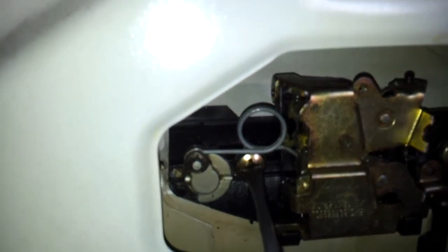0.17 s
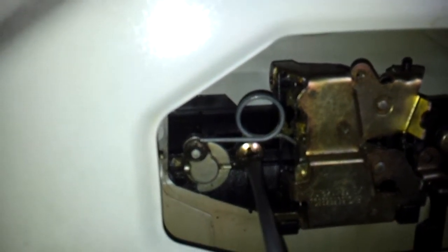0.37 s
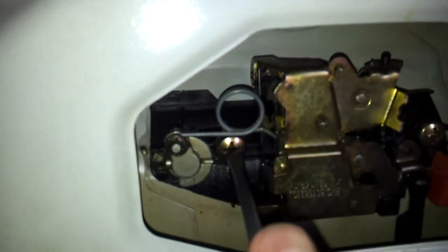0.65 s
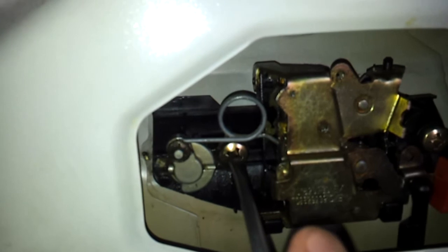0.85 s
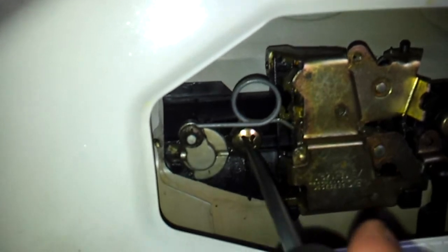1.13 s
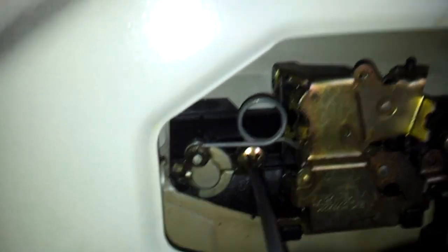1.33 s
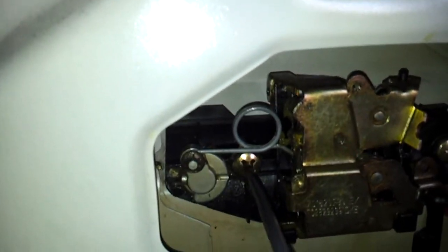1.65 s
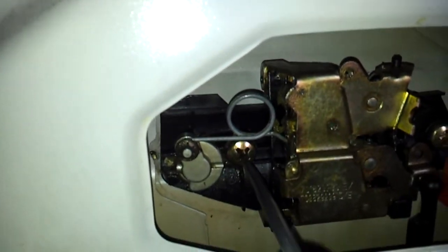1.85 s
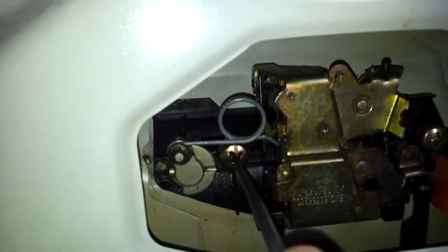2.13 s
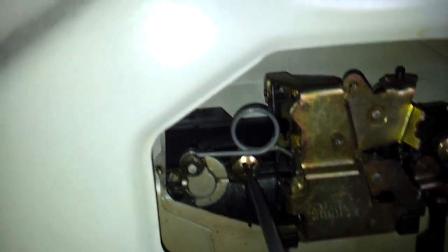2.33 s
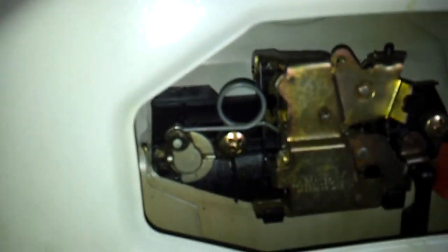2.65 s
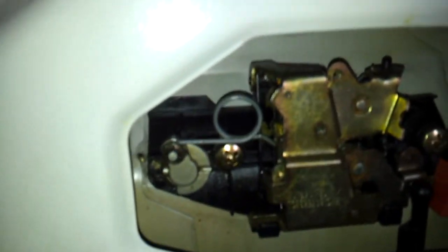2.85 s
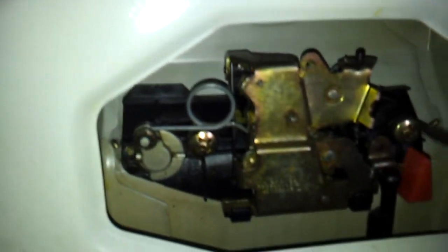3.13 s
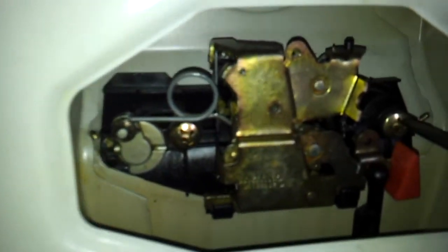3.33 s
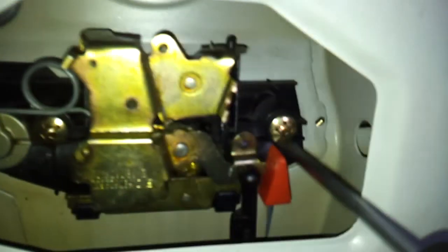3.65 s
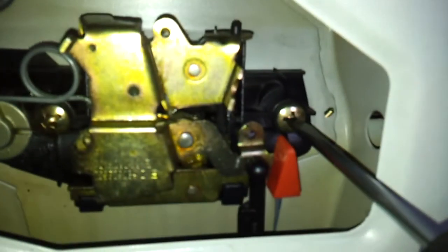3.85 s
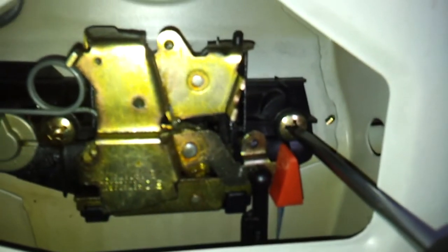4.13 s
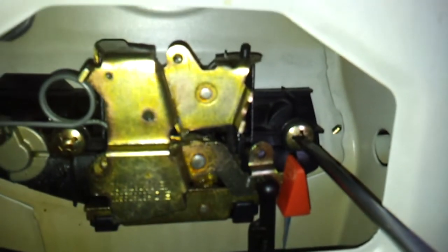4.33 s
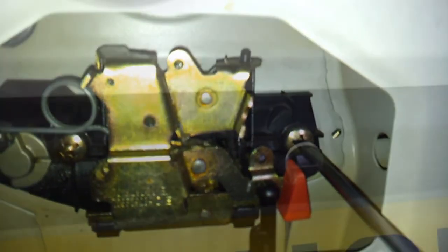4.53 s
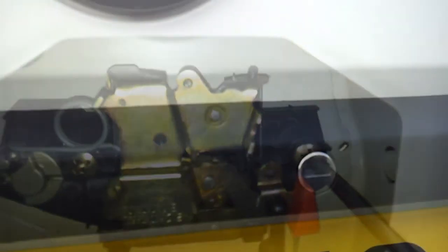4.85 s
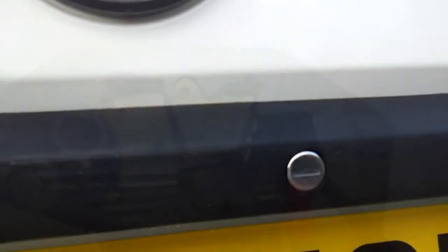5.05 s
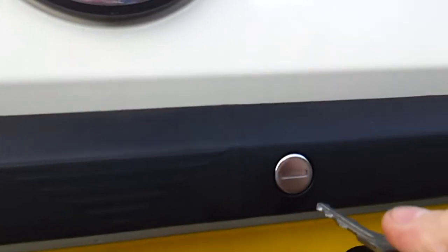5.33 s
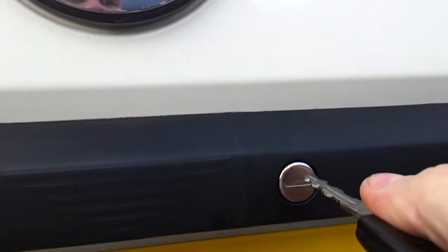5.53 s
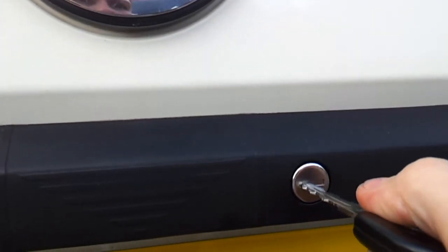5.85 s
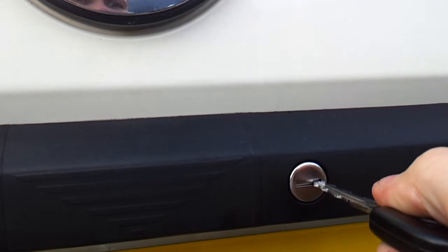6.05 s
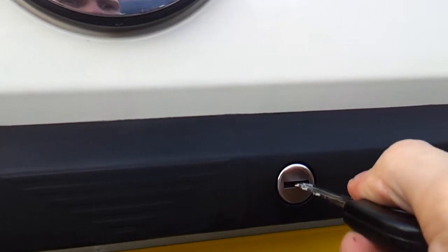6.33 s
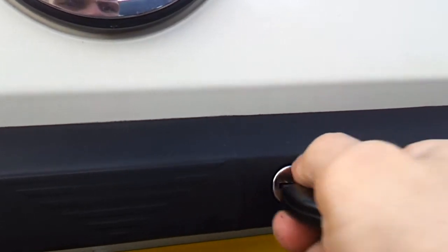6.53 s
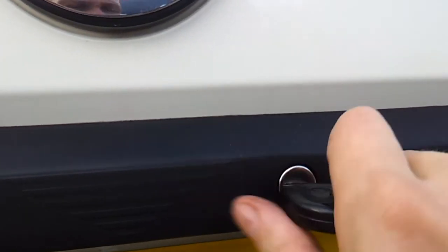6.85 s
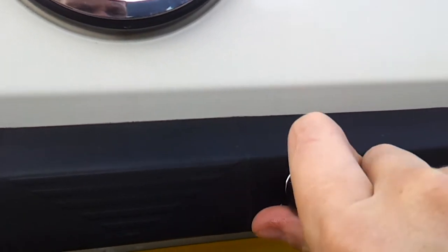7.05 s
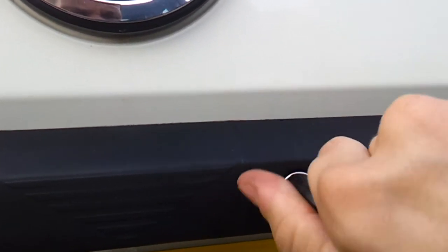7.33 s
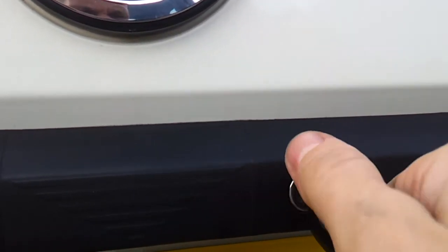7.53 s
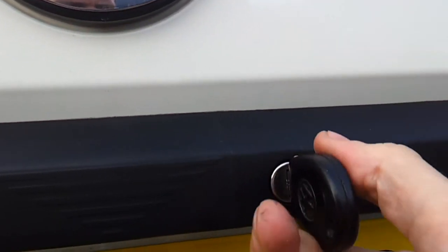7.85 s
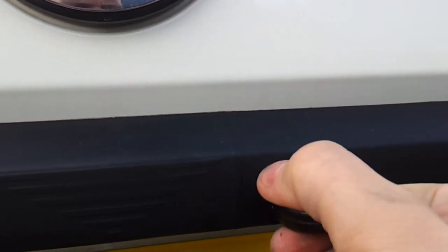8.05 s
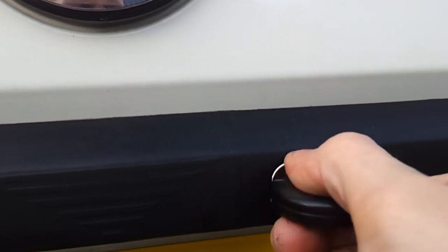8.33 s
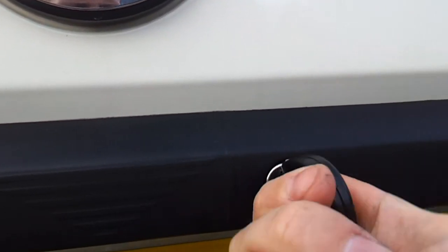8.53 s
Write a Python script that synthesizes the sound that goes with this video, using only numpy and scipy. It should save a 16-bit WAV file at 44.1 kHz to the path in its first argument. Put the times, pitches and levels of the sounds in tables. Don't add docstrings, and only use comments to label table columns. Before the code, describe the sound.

Close to a handheld camera, a screwdriver strikes and skids over a latch in a hollow sheet-metal door, each irregular blow leaving a short boxy ring. The scene fades outdoors: a near bird chirps four times, a farther one answers with echo, and a key taps a lock, rasps quickly over the pins and clicks as it turns. Level bird whistles come near the end, over low town rumble and microphone hiss.

```python
import sys
import numpy as np
from scipy import signal
from scipy.fft import rfft, irfft, next_fast_len
from scipy.io import wavfile
from scipy.ndimage import uniform_filter1d, map_coordinates

SR = 44100
rng = np.random.default_rng(int(sys.argv[2]) if len(sys.argv) > 2 else 0)


def generate_wav(signal):
    frames = np.transpose(np.atleast_2d(signal))
    scaled = np.clip(frames, -1, 1) * 32767
    pcm = np.round(scaled).astype(np.int16)
    wavfile.write(sys.argv[1], SR, pcm)


def makeup_ratio(level_db):
    decades = np.asarray(level_db, float) / 20
    return 10 ** decades


N = 382788
TOP_HZ = 14700

# (time [s], push [dB])
KEY_PUSH = [
    (6.965, -73),
    (6.974, -44),
    (7.035, -41),
    (7.067, -38.5),
    (7.099, -31.5),
    (7.143, -34.5),
    (7.152, -71),
    (7.163, -45),
    (7.18, -92),
]


def unit(x):
    return x / np.sqrt(np.mean(x ** 2) + 1e-20)


def along(points, hz):
    f, v = np.transpose(points)
    return np.interp(np.log(hz + 1), np.log(f + 1), v)


def add(out, s, sound):
    part = out[:, round(s * SR):][:, :sound.shape[1]]
    part += sound[:, :part.shape[1]]


def rush(spectrum, patchy_db):
    # (frequency [Hz], correlation [-1 to 1])
    alike = [(60, 0.32), (180, 0.7), (550, 0.33), (1650, -0.06), (4970, 0.02), (15000, -0.06)]
    z = signal.stft(rng.standard_normal((2, N + SR)), nperseg=512)[2]
    field = uniform_filter1d(rng.standard_normal(z.shape[1:]), size=6, axis=0)
    field = uniform_filter1d(field, size=14, axis=1)
    m = next_fast_len(N + SR // 2)
    noise = signal.istft(z * makeup_ratio(patchy_db * unit(field)), nperseg=512)[1]
    pair = rfft(noise[:, :m])
    hz = np.fft.rfftfreq(m, 1 / SR)
    colour = makeup_ratio(along(spectrum, hz)) * (hz < TOP_HZ)
    turn = np.arccos(np.clip(along(alike, hz), -1, 1)) / 2
    mid, side = irfft(pair * colour * [np.cos(turn), np.sin(turn)], m)[:, :N]
    return unit(np.array([mid + side, mid - side]))


def air():
    # (time [s], hiss level [dB])
    hiss_curve = [(0.0, -78.5), (1.04, -81), (1.91, -80), (2.03, -75), (2.7, -82.5), (3.14, -79.5),
                  (3.58, -84.5), (4.23, -75.5), (5.05, -85), (5.75, -78), (6.28, -81.5), (6.48, -75),
                  (6.91, -79), (7.11, -76), (7.25, -79.5), (8.68, -77)]
    # (middle [s], length [s], rumble [dB], rustle [dB])
    grips = [(0.12, 0.25, -79, -75), (0.447, 0.52, -78, -72.5), (3.098, 0.22, -74, -88),
             (3.33, 0.56, -97, -79), (4.39, 0.11, -63, -88), (5.955, 0.25, -77, -92.5),
             (6.45, 0.31, -66, -86), (6.931, 0.1, -56, -72), (7.02, 0.11, -58, -65),
             (7.113, 0.15, -38.5, -80), (7.244, 0.15, -66, -69.5), (7.704, 0.36, -67, -85),
             (8.234, 0.34, -70, -100)]
    # (from [s], to [s])
    outside = (4.8, 5.28)
    # (frequency [Hz], density [dB per Hz])
    rumble_colour = [(15, -57.5), (25, -36), (76, -5), (102, -7.5), (116, -6), (135, 2.5), (216, -6),
                     (320, -16), (420, -34), (700, -120)]
    indoor_town = [(160, -19), (280, -4.5), (379, -6.5), (590, -9.5), (650, -5.5), (720, -12), (921, -12.5),
                   (1270, -10), (1510, -13.5), (2500, -18.5), (3250, -40), (5500, -120)]
    street = [(160, -14), (280, -4.5), (572, -12), (627, -10), (774, -7.5), (1080, -11), (1220, -18.5),
              (2500, -24), (3250, -35), (5500, -120)]
    hiss_colour = [(1290, -4), (2200, -4), (3110, -4.5), (5480, -8), (6160, -9.5), (6660, -6),
                   (10700, -6.5), (14400, -8.5)]

    t = np.arange(N) / SR
    hiss_db = np.interp(t, *np.transpose(hiss_curve))
    gain_db = hiss_db - hiss_db.mean()
    s, length, *grip_db = np.transpose(grips)[:, :, None]
    swell = np.clip(1 - np.abs(2 * (t - s) / length), 0, 1) ** 2
    shake, rustle = ((makeup_ratio(db) * swell).sum(0) for db in grip_db)
    drift_db = [np.interp(4 * t, np.arange(60), rng.standard_normal(60)) for layer in range(2)]
    rumble = makeup_ratio(-69 + 0.22 * gain_db + 1.15 * drift_db[0]) + shake
    town = makeup_ratio(-73.5 + 0.83 * gain_db + 0.29 * drift_db[1])
    hiss = makeup_ratio(hiss_db + 3.0) + rustle
    turn = np.interp(t, outside, (0, np.pi / 2))
    traffic = np.cos(turn) * rush(indoor_town, 1.5) + np.sin(turn) * rush(street, 3.4)
    out = makeup_ratio(-1.0) * rumble * rush(rumble_colour, 1.3)
    out += makeup_ratio(3.5) * town * traffic
    return out + makeup_ratio(5.5) * hiss * rush(hiss_colour, 1.0)


def hum():
    # (frequency [Hz], level [dB], start [s], end [s])
    far_tones = [
        (146, -77, 0.6, 3.45),
        (660, -84, 0.66, 2.7),
        (2020, -83.5, 1.8, 2.8),
        (1270, -83, 2.1, 3.1),
        (7950, -89, 0.63, 0.95),
    ]
    t = np.arange(N) / SR
    out = np.zeros((2, N))
    for hz, db, start, end in far_tones:
        sway = [np.interp(25 * t, np.arange(230), row) for row in rng.standard_normal((4, 230))]
        sway = np.array(sway)
        tone = sway[:2] * np.sin(2 * np.pi * hz * t) + sway[2:] * np.cos(2 * np.pi * hz * t)
        out += makeup_ratio(db) * np.clip(np.minimum(t - start, end - t) / .08, 0, 1) * tone
    return out


def note(length, top_hz, end_hz, bend, lift_hz, lift_s, swell, early, hoarse_hz, flutter_db, dip_db=0):
    t = np.arange(0, length, 1 / SR)
    u = t / length
    waver, flutter = map_coordinates(rng.standard_normal(400), [[250 * t + 2, 120 * t + 200]])
    hz = top_hz - (top_hz - end_hz) * u ** bend - lift_hz * np.exp(-t / lift_s) + hoarse_hz * waver
    dip = dip_db * np.exp(-((hz - 6300) / 230) ** 2)
    loudness = np.abs(np.sin(np.pi * u ** early)) ** swell * makeup_ratio(flutter_db * flutter - dip)
    return (loudness * np.sin(2 * np.pi * np.cumsum(hz) / SR))[None]


def bird():
    # (time [s], length [s], top [Hz], end [Hz], level [dB])
    near_chirps = [
        (5.623, 0.055, 7950, 5650, -53.5),
        (5.715, 0.046, 7830, 4630, -52),
        (5.808, 0.053, 7520, 4450, -54),
        (5.905, 0.073, 7090, 4330, -57),
    ]
    far_chirps = [
        (6.414, 0.039, 7800, 5540, -66.5),
        (6.497, 0.052, 7700, 5450, -66.5),
        (6.585, 0.052, 7350, 5400, -66),
        (6.684, .058, 7150, 5500, -66),
        (6.799, 0.066, 7100, 5450, -66.5),
    ]
    whistles = [
        (8.052, 0.1, 7250, 6750, -67),
        (8.186, .087, 7140, 6750, -61.5),
        (8.333, 0.081, 7080, 6700, -63),
        (0.53, .065, 11000, 7850, -96),
        (0.59, .09, 8000, 7800, -88),
    ]
    slap_s, slap_db = 0.039, -7.5
    dry = np.zeros((1, N))
    for s, length, top_hz, end_hz, db in near_chirps:
        chirp = note(length, top_hz, end_hz, bend=1.85, lift_hz=1300, lift_s=0.002,
                     swell=1.2, early=0.9, hoarse_hz=55, flutter_db=4.0)
        add(dry, s, makeup_ratio(db + 4) * chirp)
    for k, (s, length, top_hz, end_hz, db) in enumerate(far_chirps):
        call = note(length, top_hz, end_hz, dip_db=16, bend=1.4 - .19 * k, lift_hz=150, lift_s=0.0017,
                    swell=0.3, early=1.4, hoarse_hz=35, flutter_db=2)
        call = makeup_ratio(db + 5) * call
        add(dry, s, call)
        add(dry, s + slap_s, makeup_ratio(slap_db - 2.0) * call)
    for s, length, top_hz, end_hz, db in whistles:
        whistle = note(length, top_hz, end_hz, bend=4.3, lift_hz=420, lift_s=0.0064,
                       swell=0.37, early=1.2, hoarse_hz=18, flutter_db=2.7)
        whistle = makeup_ratio(db + 3.0) * whistle
        add(dry, s, whistle)
        add(dry, s + slap_s, makeup_ratio(slap_db) * whistle)
    t = np.arange(SR // 3) / SR
    echo = rng.standard_normal((2, len(t))) * makeup_ratio(-60 * t / 0.2) * (t > .004)
    wet = signal.fftconvolve(dry, echo / np.linalg.norm(echo[0]), axes=1)[:, :N]
    return dry * makeup_ratio([[-3], [3]]) + makeup_ratio(-3.5) * wet


def garage(x):
    # (frequency [Hz], level [dB])
    tail_colour = [(160, -9.5), (400, -5.5), (1200, -4.5), (3000, -12), (10000, -15)]
    t = np.arange(SR) / SR
    tail = rng.standard_normal((2, SR)) * makeup_ratio(-60 * t / 0.44) * (t > .01)
    tail = irfft(rfft(tail) * makeup_ratio(along(tail_colour, np.fft.rfftfreq(SR, 1 / SR))), SR)
    return makeup_ratio(-25) * signal.fftconvolve(x, tail / np.linalg.norm(tail[0]), axes=1)[:, :N]


def blips(table, damping, gain_db, pan_db):
    out = np.zeros((2, N))
    t = np.arange(SR // 20) / SR
    for s, db, hz in table:
        cycles = damping * hz * t
        pulse = np.sin(2 * np.pi * hz * t) * cycles * np.exp(-cycles)
        add(out, s, makeup_ratio(db + gain_db) * makeup_ratio([[pan_db], [-pan_db]]) * pulse)
    return out


def bumps():
    # (time [s], peak [dB], frequency [Hz])
    soft_pushes = [(0.3465, -41, 160), (1.869, -48, 150), (2.141, -55, 160), (3.797, -46, 190),
                   (4.527, -56, 190), (1.503, -52.5, 143), (6.465, -48, 247), (6.476, -39, 237),
                   (6.841, -52, 370), (7.598, -40.5, 173), (8.025, -38.5, 230), (8.082, -37.5, 236),
                   (8.286, -47.5, 213), (8.59, -49.5, 170)]
    short_ticks = [(1.3937, -66, 3400), (1.4287, -57, 3770), (1.4295, -59, 3200), (4.7087, -64, 3650),
                   (5.5513, -69, 4270), (6.5574, -70, 3770), (6.567, -65, 3950), (6.599, -66, 4000),
                   (6.5765, -67, 4020), (6.5869, -61, 4140), (6.6129, -61, 4030), (0.0318, -54, 1387),
                   (0.0404, -54, 1290), (0.0544, -58, 1310), (1.4292, -59, 1010), (1.4299, -59.5, 1320),
                   (2.8848, -62.5, 2020), (4.6424, -65, 2200)]
    tip_rings = [(6.2393, -32, 6760), (6.2395, -48.5, 1880), (6.2395, -47.5, 3350), (6.4127, -40, 5500),
                 (7.5765, -32.5, 1550), (7.5648, -34.5, 5700), (8.0067, -37.5, 6940), (7.4925, -51, 800),
                 (7.5765, -35.5, 4330), (7.577, -38, 5100), (8.2155, -45, 3370), (8.2243, -48.5, 2110),
                 (6.5775, -56.5, 760), (6.616, -56, 756), (6.6485, -55, 2050), (6.818, -54, 3640),
                 (8.0175, -45, 4070), (8.3, -58, 1860), (8.8, -55, 2450), (7.7235, -55, 2000),
                 (8.2155, -50, 2450), (6.9175, -60, 2020), (8.518, -46.5, 2200), (8.5185, -43, 3200)]
    out = blips(soft_pushes, damping=2.23, gain_db=9.5, pan_db=6.0)
    out += blips(short_ticks, damping=.3, gain_db=10, pan_db=1.5)
    return out + blips(tip_rings, damping=.3, gain_db=10, pan_db=-4)


def scrape():
    # (frequency [Hz], density [dB per Hz])
    brass_colour = [(300, -21), (1800, -3), (2800, -29), (3900, -2), (5400, -11), (8700, -9),
                    (11500, -10.5), (13800, -16)]
    t = np.arange(N) / SR
    grit_db = 6 * np.interp(700 * t, np.arange(7000), rng.standard_normal(7000))
    push_db = np.interp(t, *np.transpose(KEY_PUSH), left=-200, right=-200)
    return makeup_ratio(push_db - 12 + grit_db) * makeup_ratio([[-5], [4]]) * rush(brass_colour, 3.1)


def door():
    # (frequency [Hz], level [dB], T60 [s], swell [ms])
    spring_modes = [(370, -10.5, 0.4, 11), (409, 3, .14, 2), (449.5, 2.5, 0.21, 13), (494, 0, 0.22, 13),
                    (542, 3.5, 0.21, 14.5), (586, -0.5, 0.26, 19), (660.4, 5, 0.13, 2.5),
                    (704, -3.5, 0.21, 11), (725, -5.5, 0.23, 9.5), (832, -14, .12, 3.6),
                    (905, -18, .27, 9.2), (1015, -26, 0.19, 6.7), (1110, -21, .14, 3), (1192, -21, .18, 3)]
    lever_modes = [(332.7, 0, 0.28, 13), (363, -1, 0.35, 13), (409.8, 0, .25, 12), (485, -4, 0.27, 16),
                   (584, -2.5, 0.24, 5), (717, -4.5, 0.32, 4), (844, -1.5, .18, 1.5),
                   (1115, -2.5, 0.2, 1.3), (1190, -7, 0.26, 1.5), (1320, -13, .2, 1.2),
                   (1460, -6, 0.17, 1.2), (1820, -15, .12, .8), (2300, -9, .1, .6), (2580, -13, 0.065, .6)]
    lock_modes = [(203, -12, .15, 23), (389.7, 2.5, 0.23, 7.3), (438, -2, .16, 7), (527.5, -1.5, 0.26, 5),
                  (649, -7.5, .15, 3.5), (757, 0, 0.2, 2.3), (912, -14, .2, 2.2), (1050, -8, 0.16, 1.5)]
    # (time [s], level [dB], loss [dB per octave up])
    spring_blows = [
        (0.3476, -30, -4),
        (1.2017, -80, -3),
        (1.8687, -38.5, -4.5),
        (2.1396, -43.5, 0.5),
        (2.9098, -67, 5),
    ]
    lever_blows = [
        (3.7963, -35.5, 1),
        (4.173, -47, -2),
        (4.2854, -48, -5),
        (4.339, -51.5, -5.5),
        (4.5254, -49.5, 8.5),
        (4.7192, -54, 5),
    ]
    lock_blows = [
        (6.2394, -57.5, 5.5),
        (7.0192, -38.5, 3),
        (7.0516, -51, 3),
        (7.0887, -42, 3),
        (7.1012, -40.5, 2),
        (7.1226, -52, 8),
        (7.5768, -41.5, -4.5),
        (8.0067, -53, -1),
    ]
    out = np.zeros((2, N))
    t = np.arange(SR * 2 // 5) / SR
    places = ((spring_modes, spring_blows, 0.1), (lever_modes, lever_blows, -0.6),
              (lock_modes, lock_blows, -1.5))
    for modes, blows, pan_db in places:
        hz, level, t60, swell_ms = np.transpose(modes)[:, :, None]
        fade = makeup_ratio(level - 60 * t / t60) * (1 - np.exp(-1000 * t / swell_ms)) ** 2
        start = 2 * np.pi * rng.random(hz.shape)
        for s, db, loss_db in blows:
            size, phase, apart = rng.standard_normal((3, len(modes), 1))
            angle = 2 * np.pi * hz * t + start + .4 * phase
            ring = fade * makeup_ratio(db + 1.1 * size - loss_db * np.log2(hz / 500))
            ears = [makeup_ratio(ear * pan_db) * (ring * np.sin(angle + ear * 0.25 * apart)).sum(0) for ear in (1, -1)]
            add(out, s, np.array(ears))
    return out


def metal(when, levels, ring_hz, rise_ms, tone, t60, side, crack, crack_ms, ring_db, spread, lag_ms, fill_ms):
    count = 240
    t = np.arange(SR // 4) / SR
    place = (np.arange(count) + rng.random(count)) / count
    hz = (80 ** .4 + (TOP_HZ ** .4 - 80 ** .4) * place) ** 2.5
    life = along(t60, hz) * makeup_ratio(.6 * rng.standard_normal(count))
    fade = makeup_ratio(-60 * t / life[:, None])
    fade *= 1 + crack * np.exp(-1000 * t / crack_ms) * np.minimum(1, hz[:, None] / 3000)
    fade *= 1 - np.exp(-1000 * t / fill_ms * (hz[:, None] / 500) ** 2)
    angle = 2 * np.pi * hz[:, None] * t
    ring = np.vstack([fade * np.sin(angle), fade * np.cos(angle)]).astype(np.float32)

    reach = np.array([along(list(zip((600, 1400, 4000, 8500), row)), hz) for row in levels])
    near = ring_db * np.exp(-(np.log(hz / ring_hz[:, None]) / 0.076) ** 2)
    rise = rise_ms[:, None] / 1000 + 2e-5
    draw = rng.standard_normal((len(when), 3, count))
    size = makeup_ratio(reach + near + along(tone, hz) + 1.95 * draw[:, 0]) * (hz / 1000) ** -.2 / np.sqrt(count)
    phase = spread * draw[:, 1] - 2 * np.pi * hz * rise
    apart = np.pi * hz * lag_ms / 1000 + draw[:, 2] * (0.34 + .5 * np.minimum(1, hz / 1200))
    balance = makeup_ratio(np.outer([.5, -.5], along(side, hz)))[:, None]
    ears = balance * size * np.exp(1j * np.array([phase - apart, phase + apart]))
    sounds = np.concatenate([ears.real, ears.imag], axis=2).astype(np.float32) @ ring
    out = np.zeros((2, N))
    for s, slow, sound in zip(when, rise, sounds.swapaxes(0, 1)):
        add(out, s, sound * (1 - np.exp(-t / slow)))
    return signal.sosfilt(signal.butter(3, 110, "high", fs=SR, output="sos"), out)


def latch():
    # (time [s], bracket peak [dB], panel [dB], tip [dB], ring [Hz])
    knocks = [(0.0325, -52, 0.5, -0.5, 1410), (0.3431, -37, 1, -24.5, 1130), (0.3476, -28.5, -4, -17, 1200),
              (0.3537, -29, -7, -24.5, 1195), (0.3815, -58.5, -7, 9, 1200), (0.3885, -46, 3.5, -13.5, 1000),
              (1.2017, -65.5, 11, 3.5, 1400), (1.4998, -50.5, -12, 0, 1270),
              (1.8687, -30.5, -4.5, -15, 1620), (2.1396, -43, 1.5, -27.5, 1610),
              (2.2193, -46.5, -3, -4.5, 1420), (2.8394, -71.5, 10, 9, 1990), (2.9098, -60.5, 9, 2.5, 1420),
              (3.2011, -58.5, -12, -10, 1440), (3.7959, -20, -10, -9, 1234), (3.985, -73, 3, 8.5, 1300),
              (4.173, -35, -12.5, -15.5, 1030), (4.2856, -28.5, -12.5, 1, 1330),
              (4.2955, -34, -12.5, -7, 1300), (4.339, -38, -7, 4, 1500), (4.5251, -48.5, 7, -15.5, 1200),
              (4.7192, -46, -4.5, -19, 1440), (4.8482, -70.5, 9, -15, 1030), (5.3944, -85, -8, 24, 1225)]
    # (time [s], bracket peak [dB], panel [dB], tip [dB], length [ms])
    skids = [
        (0.103, -56.5, -1, -0.5, 25.6),
        (1.9094, -57, 12, 0, 30.7),
        (2.0514, -73, -3, 9, 24),
        (2.9396, -43, -18.5, -2, 27.2),
        (4.1548, -39, -5, -17, 25.4),
        (5.4544, -87, -1, 19, 28),
    ]
    # (frequency [Hz], level [dB])
    latch_tone = [(90, -20), (150, 1.5), (290, -1), (410, 9), (520, 5.5), (660, 6.5), (850, 7), (1000, 4),
                  (1200, 4), (1450, 5.5), (1750, 6.5), (2200, 6), (7000, 11), (14700, -8)]
    # (frequency [Hz], T60 [s])
    latch_t60 = [(120, 0.34), (400, 0.38), (700, 0.3), (1300, 0.13), (2500, 0.13), (6000, 0.067),
                 (9000, 0.06), (14000, 0.019)]
    # (frequency [Hz], left minus right [dB])
    latch_side = [(60, 8), (240, 3.5), (950, -1.5), (3770, -1.5), (15000, -3.5)]
    skid = np.repeat(skids, 9, axis=0)
    place, size, pitch = rng.random((len(skid), 3)).T
    touch_s = skid[:, 0] + place * skid[:, 4] / 1000
    touch_db = skid[:, 1] - 12 + 6 * place + 5 * size
    touches = np.c_[touch_s, touch_db, skid[:, 2:4], 1000 + 3500 * pitch]
    s, db, panel_db, tip_db, ring_hz = np.vstack([knocks, touches]).T
    levels = np.c_[db + panel_db + 1.5, db - 1.5, db + tip_db - 8, db + tip_db - 11]
    rise_ms = 1.893 * makeup_ratio(-.3 * (tip_db + 20))
    return metal(s, levels, ring_hz, rise_ms, latch_tone, latch_t60, latch_side, crack=9.6, crack_ms=0.92,
                 ring_db=6.0, spread=2.7, lag_ms=0.14, fill_ms=3)


def key():
    # (time [s], pins peak [dB], panel [dB], barrel [dB], blade [dB])
    on_barrel = [(6.648, -48.5, -14, 2, -2), (6.8156, -42, -9, -5, -9), (6.9182, -43.5, -14, 3.5, -11),
                 (7.0512, -41, 1, 11.5, -17), (7.2217, -51.5, 1, -14, 0), (7.2365, -47, -7, -13, -6),
                 (7.4915, -57.5, 4.5, 14.5, -10), (7.5762, -21, -15, -4, -11), (7.724, -58, 1, 14.5, 4.5),
                 (7.848, -60.5, 2, 14, -18), (7.861, -43.5, -13.5, -4.5, -10), (7.884, -47.5, 6.5, 5.5, 0),
                 (7.909, -44.5, -15, -4, -13), (8.2148, -50, -30, 0.5, 5), (8.2236, -40.5, -22.5, -9, -6),
                 (8.4667, -59.5, -7, 11, 1), (8.4816, -54.5, -6, 4, -10), (8.6473, -39, -8.5, -5.5, -13)]
    # (time [s], pins peak [dB], panel [dB], barrel [dB])
    on_blade = [
        (6.3928, -44, -12, -9),
        (6.5774, -53.5, -5, -1),
        (7.0148, -37, -4, 4),
        (7.0192, -26.5, -21, -20),
        (7.0318, -35.5, -5.5, -12),
        (7.0617, -36.5, 1.5, -23),
        (7.2025, -49.5, -13, 6),
        (8.518, -35.5, -35, -12),
        (8.6354, -42, -10, -2.5),
    ]
    on_cover = [(6.2394, -29.5, -20.5, -11), (6.6144, -54.5, -1.5, -2), (6.7096, -62, 3, 1),
                (6.8019, -51.5, -4, 2), (7.1408, -33.5, -28, -5), (7.5524, -38, -9, -6),
                (7.5574, -45, -9, -2), (7.5705, -36, -11, -5), (7.5648, -30, -13, 9),
                (7.9964, -45, -30, -2), (8.0067, -29.5, -11.5, -4), (8.3505, -64, -3, 11),
                (8.4515, -61.5, 8, 12), (8.5323, -38, -35, -19)]
    on_pins = [(6.377, -57, -10, -2), (6.3876, -41, -13, -2.5), (6.4126, -28, -15, -20),
               (6.55, -46, -21, -30), (6.7382, -51, -9.5, -14), (6.9304, -47.5, -13.5, 1),
               (6.9369, -44.5, -6, -14), (6.9559, -41, -21, -1.5), (6.9785, -37, -17, -5),
               (7.0697, -44, -21, -18), (7.0887, -25.5, -9.5, -15), (7.1012, -24, -11, 0.5),
               (7.1035, -21.5, -16.5, -8.5), (7.1065, -28, -17, -0.5), (7.0805, -39, -11, -9),
               (7.0955, -29, -6, -12), (7.1125, -40, -15, -8), (7.1305, -30, -16, -17),
               (7.1365, -34, -25, -15), (7.0425, -38, -9, -10), (6.9855, -39.5, -15, 2.5),
               (7.1225, -23, -19, -22), (7.156, -35, -29, -25), (7.1605, -30.5, -32, -22),
               (7.5483, -46, -16, -10), (8.0163, -27, -17.5, -30), (8.525, -33.5, -23, -17),
               (8.6222, -43.5, -11, -7)]
    # (panel [dB], barrel [dB], blade [dB])
    spray_colour = (-14, -11.5, -8.5)
    # (frequency [Hz], level [dB])
    lock_tone = [(90, -12), (180, -2.5), (290, -4), (400, 5.5), (760, 8.5), (1000, 6), (1500, 2.5),
                 (2100, 2.5), (2800, -7.5), (3900, 8.5), (5500, -1), (7000, 2), (8800, 0.5), (11000, -11.5),
                 (14700, -12.5)]
    # (frequency [Hz], T60 [s])
    lock_t60 = [(120, 0.65), (500, 0.22), (1300, 0.072), (2500, 0.1), (6000, 0.062), (14000, 0.034)]
    # (frequency [Hz], left minus right [dB])
    lock_side = [(60, -1), (150, 8), (380, 1), (950, 1.5), (2380, -6), (5980, -9), (15000, -23)]
    s, db = np.transpose(KEY_PUSH)
    draw = rng.random((70, 3))
    when = s[0] + (s[-1] - s[0]) * (np.arange(len(draw)) + draw[:, 0]) / len(draw)
    size_db = np.interp(when, s, db) - 8.0 + 9 * draw[:, 1]
    pitch_hz = np.where(draw[:, 2] < .45, 3950, 8700) * (1 + .1 * (draw[:, 2] % .45 - .22))
    spray = np.c_[when, size_db, np.tile(spray_colour, (len(when), 1)), pitch_hz]
    clicks = [(*row, -7, 4000) for row in on_blade]
    clicks += [(*row, -11.5, 6900) for row in on_cover]
    clicks += [(*row, -15.5, 8760) for row in on_pins]
    clicks += [(*row, 2000) for row in on_barrel]
    s, db, panel_db, barrel_db, blade_db, ring_hz = np.vstack([clicks, spray]).T
    levels = np.c_[db + panel_db + 1.5, db + barrel_db - 2.5, db + blade_db - 6, db - 8]
    return metal(s, levels, ring_hz, np.full(len(s), 0.288), lock_tone, lock_t60, lock_side, crack=6,
                 crack_ms=1.4, ring_db=8.0, spread=1.9, lag_ms=0.14, fill_ms=1.5)


def scene():
    hits = door() + latch() + key()
    return air() + hum() + bird() + garage(hits) + bumps() + scrape() + hits


def low_pass(x):
    return signal.sosfilt(signal.butter(12, 15790, fs=SR, output="sos"), x)


def record(dry):
    return low_pass(dry)


dry = scene()
out = record(dry)
generate_wav(out)
```